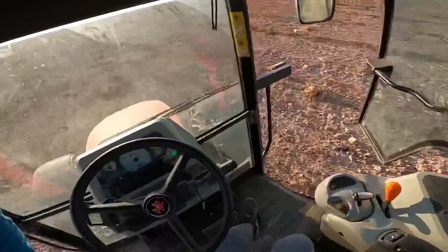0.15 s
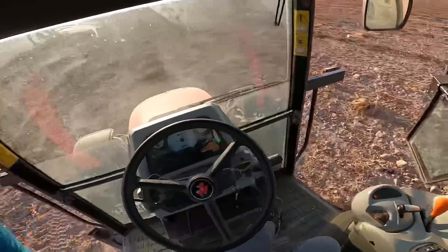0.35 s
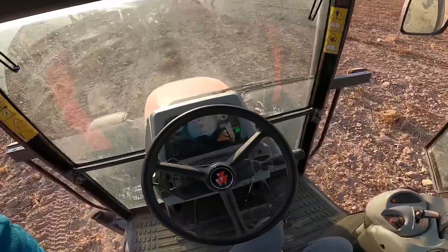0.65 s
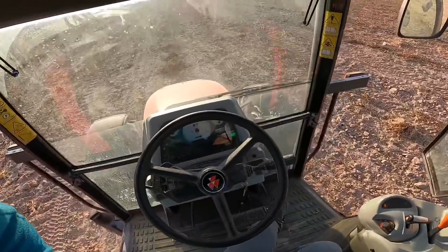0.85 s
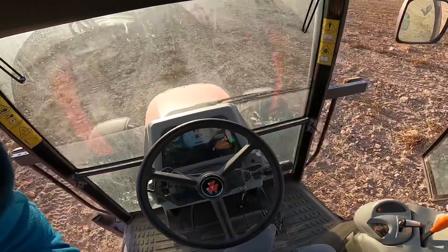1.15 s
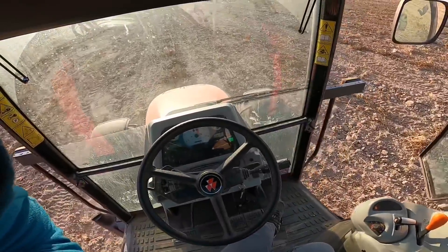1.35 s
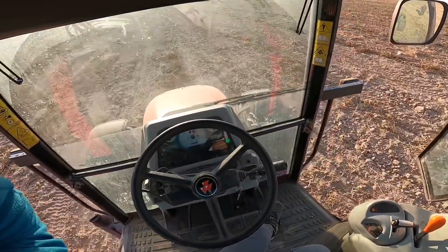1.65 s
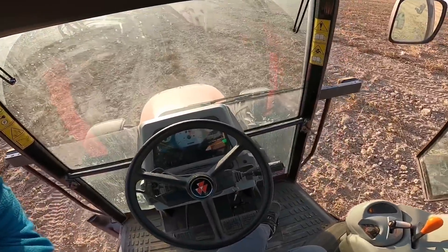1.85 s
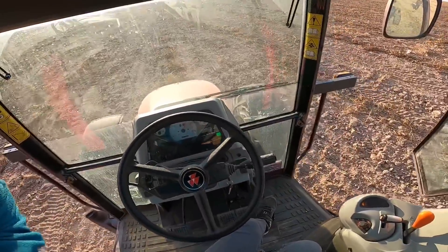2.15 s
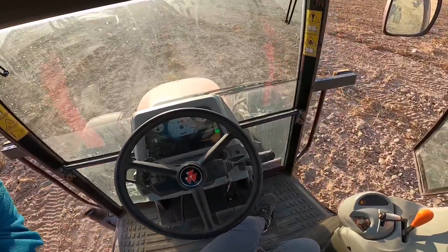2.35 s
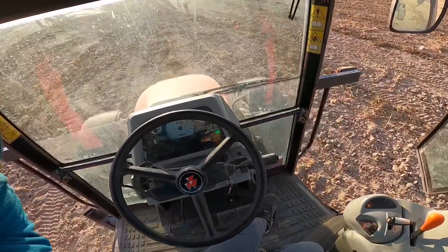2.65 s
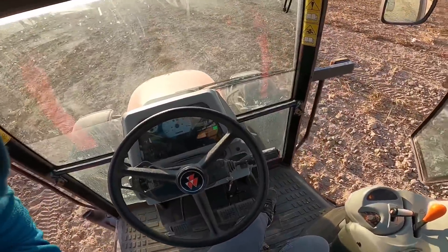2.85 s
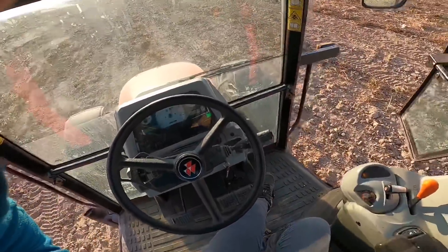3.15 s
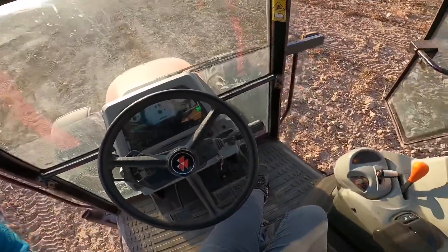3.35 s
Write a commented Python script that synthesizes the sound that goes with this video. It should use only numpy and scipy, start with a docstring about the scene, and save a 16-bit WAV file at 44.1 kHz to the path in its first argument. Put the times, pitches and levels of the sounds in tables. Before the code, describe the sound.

Steady loaded tractor diesel heard from the driver's seat, booming drone, fast knocking and raspy hiss

```python
"""A four-cylinder tractor diesel pulls steadily across a field, heard from the driver's seat.
At first the microphone faces the side window, which colours the sound; at 0.19 s it quickly swings forward.
Throughout, the firing rate booms as a hum, and knocks and rattles repeat with every two turns of the crank.
Over them lie fluttering whines, noise bursts of combustion rasp, and the filtered noise of cab rumble and fan hiss.
The clatter and its metallic band swell and fade, and the rasp ends a little stronger than it began."""
import sys
import numpy as np
from scipy import signal
from scipy.fft import rfft, irfft
from scipy.io import wavfile
from scipy.ndimage import uniform_filter1d

SR = 44100
rng = np.random.default_rng(int(sys.argv[2]) if len(sys.argv) > 2 else 0)


def log_audio(samples):
    """Write samples as a 16-bit WAV file to the path given in sys.argv[1]."""
    # one column per channel
    frames = np.atleast_2d(samples).T
    # limit to full scale, then quantise
    limited = np.clip(frames, -1, 1)
    pcm = np.round(limited * 32767).astype(np.int16)
    wavfile.write(sys.argv[1], SR, pcm)


N = 154350  # samples, 3.5 s

# A "cycle" is two turns of the crank, in which every cylinder fires once.
# Source levels are those before the microphone colours the sound.

# Engine speed: t/s, speed/rpm
ENGINE_SPEED = [(0.0, 1703.5), (0.125, 1693.0), (0.25, 1690.2), (0.375, 1690.0), (0.5, 1690.7),
                (0.625, 1689.7), (0.75, 1690.2), (0.875, 1693.4), (1.0, 1691.6), (1.125, 1691.1),
                (1.25, 1691.7), (1.375, 1689.4), (1.5, 1689.4), (1.625, 1690.1), (1.75, 1687.9),
                (1.875, 1687.3), (2.0, 1685.3), (2.125, 1685.6), (2.25, 1685.5), (2.375, 1687.0),
                (2.5, 1690.4), (2.625, 1690.9), (2.75, 1690.5), (2.875, 1687.7), (3.0, 1688.5),
                (3.125, 1687.1), (3.25, 1685.8), (3.375, 1688.8), (3.5, 1690.3)]

# Background noises, power in each hertz of pitch: f/Hz, level/dB per Hz
RUMBLE_SPECTRUM = [(10, -66), (20, -58), (35, -58), (60, -50), (100, -52), (190, -53), (245, -59.5),
                   (290, -53), (380, -64.5), (520, -63), (680, -63.5), (810, -68), (1500, -99),
                   (6000, -140)]
HISS_SPECTRUM = [(2000, -80), (4000, -79), (5200, -77), (5800, -72), (6400, -81), (7400, -80),
                 (8000, -87.5), (8600, -96.5), (10500, -97), (13000, -106), (15500, -122)]
# Combustion noise, before its pulses and level changes: f/Hz, level/dB per Hz
RASP_SPECTRUM = [(100, -100), (500, -74.5), (810, -73.5), (950, -65.5), (1200, -63), (1600, -63.5),
                 (2000, -67), (2250, -64), (2550, -69.5), (2900, -72), (4000, -71.5), (5000, -82),
                 (7400, -81.5), (8600, -106), (12000, -140)]
# Stereo width of these noises: f/Hz, side over mid/dB
NOISE_WIDTH = [(40, 3.5), (150, -12.5), (300, -19), (600, -4.5), (1000, -9), (1550, -10), (2200, -1),
               (3300, -1.5), (4500, 0), (8000, 1.5)]

# Level of the rasp over time: t/s, level/dB
RASP_LEVEL = [(0, -3), (.6, -1.5), (1.2, -2.7), (1.8, -1), (2.4, -0.9), (3, -1.3), (3.5, 0)]
# How loud each cylinder's rasp is against the others: level/dB, one per cylinder
CYLINDER_LEVEL = [0.58, 0.45, 0.18, -0.44]

# Knocks of pistons, injectors and valves: place in the cycle/0-1, ring f/Hz, peak level/dB
# (before KNOCKS_DB is added), length/s
KNOCKS = [(.03, 280, -24, .007), (.03, 1950, -26.5, .0024), (.07, 1550, -26, .002), (.07, 1030, -28, .0017),
          (.15, 600, -29, .004), (.16, 115, -21, .007), (.17, 1080, -27, .0017), (.19, 1950, -28, .003),
          (.25, 1100, -29, .0015), (.255, 240, -27, .006), (.3, 1350, -29, .0017),
          (.32, 1500, -24.5, .0023), (.35, 620, -28, .003), (.395, 2050, -24.5, .0022),
          (.41, 270, -20, .0055), (.48, 620, -26, .0022), (.52, 1930, -28, .003), (.5, 1550, -30, .0013),
          (.56, 160, -16, .005), (.66, 220, -28, .004), (.66, 640, -28, .003), (.665, 1950, -29, .002),
          (.73, 1550, -28, .0016), (.75, 1130, -23.5, .0032), (.77, 540, -30, .003), (.8, 125, -23, .006),
          (.82, 1680, -27, .002), (.885, 1050, -25, .002), (.89, 1920, -26, .0018), (.94, 290, -26, .005),
          (.95, 1070, -25, .0022)]
# Small rattles between the knocks, level of each engine line: f/Hz, level/dB
RATTLE_LEVEL = [(14, -58), (210, -58), (330, -55.5), (400, -67), (480, -48), (680, -55), (810, -64),
                (950, -61), (1550, -56.5), (2000, -61), (2300, -61), (2550, -60.5), (2800, -57),
                (3500, -59), (5000, -71.5)]
# Strong engine lines, cab drone below and gear and timing whine above:
# multiple of the cycle rate, level/dB (before LINES_DB is added)
STRONG_LINES = [(2, -38), (3, -41), (5, -34), (6, -38), (7, -48), (8, -34), (9, -34), (10, -34), (11, -47),
                (12, -36), (13, -39), (14, -47), (15, -43), (16, -42), (17, -46), (18, -50), (19, -34),
                (20, -39), (21, -36), (22, -52), (23, -49), (24, -53), (31, -47), (34, -49), (35, -46),
                (36, -48), (40, -46), (48, -38), (64, -46), (67, -48), (68, -42), (74, -43), (75, -46),
                (77, -46), (79, -47), (80, -44), (82, -44), (84, -40), (100, -47), (108, -46), (109, -43),
                (111, -48), (112, -46), (115, -47), (116, -43), (120, -46), (130, -41), (136, -42),
                (138, -41), (144, -45.5), (150, -45), (168, -40.5)]
# Part of each line that shifts slowly as the microphone moves in the cab: f/Hz, level/dB
DRIFT_LEVEL = [(60, -74), (280, -51), (400, -59), (520, -57), (675, -56), (810, -65.5), (950, -56),
               (1500, -50.5), (2000, -56.5), (2280, -64.5), (2365, -52), (2450, -60.5), (3000, -58.5),
               (5000, -71.5)]
# Stereo width of the engine lines: f/Hz, side over mid/dB
LINE_WIDTH = [(60, -7), (150, -15.5), (300, -18), (600, -19), (1100, -20.5), (1550, -22), (2000, -21),
              (3000, -1)]
# Clatter over time: t/s, level/dB, extra level of its metallic band/dB
CLATTER_LEVEL = [(0, -1, 0), (.5, 0.5, -3.5), (1, 0.5, 0), (1.5, -0.1, 3.5), (2, -0.5, 2), (2.5, 0.5, -1),
                 (3, 0.6, -0.5), (3.5, 0, 2)]

# The cab's left-right balance: f/Hz, left over right/dB
CAB_BALANCE = [(100, -0.1), (250, -.5), (900, 0.5), (1550, 2.8), (2700, 3), (4500, 2.5), (7100, 3),
               (8000, -1.5), (10500, -4.5), (13000, -2)]
# Phase between the microphone's two ports: f/Hz, left ahead of right/radians
PORT_PHASE = [(100, -0.027), (950, -0.23), (1550, -0.8), (2300, -1.75), (3000, -0.73), (4000, -1.37)]
# Colour of the cab while the microphone faces the side window: f/Hz, level/dB
SIDEWAYS_COLOUR = [(150, 0.5), (350, 2), (520, 0), (590, -9), (680, -1.5), (780, 1.5), (1100, -0.5),
                   (1700, 1.5), (1950, -2), (2200, 6), (2365, 0.5), (2550, 7.5), (2900, 0), (5000, 2.5),
                   (9000, -0.5)]

CYLINDERS = 4
# Tones at average engine speed: pitch, level, unsteadiness of pitch
PUMP_HZ, PUMP_DB, PUMP_UNSTEADY_HZ = 584.2, -37.5, 1.0
PANEL_HZ, PANEL_DB, PANEL_UNSTEADY_HZ = 223.8, -39, 3.5
DRIVE_HZ, DRIVE_DB, DRIVE_UNSTEADY_HZ = 943, -43, 1.2
RASP_PULSE_DB, RASP_FLICKER_DB = 6, 2.3
RASP_DECAY = 0.12  # share of the time between firings
RASP_LAG, BOOM_LAG = .155, .023  # share of a cycle: first cylinder's flare, peak of the boom
KNOCKS_DB, LINES_DB = -1.97, -0.15
CRANK_JITTER_S = .000008
DRIFT_HZ = 1.17  # pace of the wandering blend
CLATTER_WAVER_DB = 0.39
BRIGHT_HZ, BRIGHT_WIDTH_HZ = 2154, 420  # the clatter's metallic band
BOOM_DB, BOOM_WAVER_DB, BOOM_LEFT_DB = -15, -0.9, 0.5
TURN_S, TURN_LENGTH_S = 0.19, 0.043  # start and length of the microphone's swing forward
SIDEWAYS_PATH_S = 0.00023  # spread of the echo paths before the swing
TOP_HZ = 15700


def undb(db):
    """Turn decibels into gain."""
    return 10 ** (np.asarray(db) / 20)


def curve(points, hz):
    """Read (Hz, value) points on a log-frequency axis."""
    p = np.array(points, float)
    return np.interp(np.log(np.maximum(hz, 1)), np.log(p[:, 0]), p[:, 1])


def pan(left_db):
    """Left and right gains for a level difference, keeping the average power."""
    gains = undb(np.array([[1], [-1]]) * left_db / 2)
    return gains / np.sqrt(np.mean(gains ** 2, axis=0))


def walk(rate):
    """Smooth random wandering of spread 1, changing about rate times a second."""
    f = np.fft.rfftfreq(N, 1 / SR)
    smoothing = np.exp(-(f / rate) ** 2) * (f > 0)
    wander = irfft(rfft(rng.standard_normal(N)) * smoothing, N)
    return wander / wander.std()


def facing_forward(t):
    """How far the microphone has swung: 0 is sideways, 1 is forward."""
    return np.clip((t - TURN_S) / TURN_LENGTH_S, 0, 1)


def noise(spectrum):
    """Stereo noise of a given spectrum, from a shared (mid) and an opposed (side) random part."""
    f = np.fft.rfftfreq(N, 1 / SR)
    mid, side = rfft(rng.standard_normal((2, N)))
    width = undb(curve(NOISE_WIDTH, f))
    both = (mid + np.array([[1], [-1]]) * width * side) / np.hypot(1, width)
    return irfft(both * undb(curve(spectrum, f)) * np.sqrt(SR / 2), N)


def fan_hiss():
    """The fan's hiss is steady noise in the treble."""
    return noise(HISS_SPECTRUM)


def cab_rumble():
    """The cab's rumble is steady noise, strongest in the bass."""
    return noise(RUMBLE_SPECTRUM)


def whine(speed, hz, db, unsteady_hz):
    """A fluttering tone that follows the engine's speed (1 is average)."""
    pitch = hz * speed + unsteady_hz * walk(19.2)
    phase = 2 * np.pi * np.cumsum(pitch) / SR
    flutter_db = 1.5 * walk(19)
    return np.sqrt(2) * np.sin(phase) * undb(db + flutter_db)


def accessories(speed):
    """The hydraulic pump, a buzzing cab panel and a faint drive whine each give one tone."""
    pump = whine(speed, PUMP_HZ, PUMP_DB, PUMP_UNSTEADY_HZ)
    panel = whine(speed, PANEL_HZ, PANEL_DB, PANEL_UNSTEADY_HZ)
    drive = whine(speed, DRIVE_HZ, DRIVE_DB, DRIVE_UNSTEADY_HZ)
    return pump + panel + drive


def rasp(cycle, t):
    """Combustion noise flares at each firing and dies away, a little differently for each cylinder."""
    firing = CYLINDERS * (cycle + 1 - RASP_LAG)  # the whole part counts the firings
    flare = np.exp(-(firing % 1) / RASP_DECAY)
    cylinder_db = np.array(CYLINDER_LEVEL)[firing.astype(int) % CYLINDERS]
    pulse_db = RASP_PULSE_DB * (flare - flare.mean()) + cylinder_db
    smooth_db = uniform_filter1d(pulse_db, size=60)  # softens the jumps
    flickering = noise(RASP_SPECTRUM) * undb(smooth_db + RASP_FLICKER_DB * walk(21))
    return flickering * undb(np.interp(t, *np.array(RASP_LEVEL).T))


def knocks(k, cycle_hz):
    """Engine lines of the knocks: each knock swells and dies away at its own pitch."""
    place, hz, db, length = np.array(KNOCKS).T[:, :, None]
    ring = np.exp(-(np.pi * length * (k * cycle_hz - hz)) ** 2) * length * cycle_hz * np.sqrt(np.pi / 2)
    timing = np.exp(-2j * np.pi * k * place)
    return np.sum(undb(db + KNOCKS_DB) * ring * timing, axis=0)


def rattle(spectrum, hz):
    """Small rattles: engine lines of given levels with random timing."""
    return undb(curve(spectrum, hz)) * np.exp(2j * np.pi * rng.random(len(hz)))


def repeat(lines, hz, angle, size=16384):
    """Play engine lines round and round with the crank, shifted apart in phase for stereo width."""
    lead = np.sign(rng.random(len(hz)) - .5) * np.array([[1], [-1]])
    apart = np.arctan(undb(curve(LINE_WIDTH, hz))) * lead
    one_cycle = irfft(np.pad(lines * np.exp(1j * apart), ((0, 0), (1, 0))), size) * size / np.sqrt(2)
    place = angle % 1 * size
    return np.array([np.interp(place, np.arange(size + 1), np.append(side, side[0])) for side in one_cycle])


def swell(sound, t):
    """The clatter's level changes over time, with extra changes in its metallic band."""
    at, all_db, bright_db = np.array(CLATTER_LEVEL).T
    f = np.fft.rfftfreq(N, 1 / SR)
    bright = irfft(rfft(sound) * np.exp(-((f - BRIGHT_HZ) / BRIGHT_WIDTH_HZ) ** 2), N)
    extra = bright * (undb(np.interp(t, at, bright_db)) - 1)
    return (sound + extra) * undb(np.interp(t, at, all_db))


def clatter(cycle, t, count=360, blends=4):
    """Knocks, rattles and gear mesh repeat each cycle; their blend shifts as the microphone moves."""
    k = np.arange(1, count + 1)
    hz = k * cycle[-1] * SR / N  # multiples of the average cycle rate
    lines = knocks(k, hz[0]) + rattle(RATTLE_LEVEL, hz)
    lines = lines * (k != CYLINDERS)  # the boom supplies the firing rate
    for order, line_db in STRONG_LINES:
        i = int(order) - 1
        lines[i] *= undb(line_db + LINES_DB) / abs(lines[i])  # new level, same timing
    angle = cycle + CRANK_JITTER_S * hz[0] * walk(21)

    blend = np.array([walk(DRIFT_HZ) for _ in range(blends)])
    shares = blend / np.linalg.norm(blend, axis=0)  # keeps the total power even
    drift = sum(repeat(rattle(DRIFT_LEVEL, hz), hz, angle) * share for share in shares)

    # Before the swing, scattered echo paths shift the lines in time.
    sideways = lines * np.exp(2j * np.pi * hz * SIDEWAYS_PATH_S * rng.standard_normal(count))
    turned = facing_forward(t)
    steady = repeat(sideways, hz, angle) * (1 - turned) + repeat(lines, hz, angle) * turned
    return swell((steady + drift) * undb(CLATTER_WAVER_DB * walk(30)), t)


def boom(cycle):
    """The firing rate resonates in the cab as a deep hum, one wave per firing."""
    hum = np.sqrt(2) * np.cos(2 * np.pi * CYLINDERS * (cycle - BOOM_LAG))
    return hum * undb(BOOM_DB + BOOM_WAVER_DB * walk(6)) * pan(BOOM_LEFT_DB)


def microphone(sound, t, size=4096):
    """Two ports a little apart hear phase and level differences, first sideways, then forward."""
    f = np.fft.rfftfreq(N + 2 * size, 1 / SR)
    phase = np.exp(.5j * np.array([[1], [-1]]) * curve(PORT_PHASE, f))
    ports = pan(curve(CAB_BALANCE, f)) * phase
    # Mirrored ends keep the filter from wrapping the end into the start.
    padded = np.pad(sound, ((0, 0), (size, size)), mode="reflect", reflect_type="odd")
    heard = rfft(padded) * ports
    before = irfft(heard * undb(curve(SIDEWAYS_COLOUR, f)), N + 2 * size)[:, size:-size]
    after = irfft(heard, N + 2 * size)[:, size:-size]
    turned = facing_forward(t)
    return before * (1 - turned) + after * turned


def scene():
    """One crankshaft drives the boom, clatter, rasp and whines; a cycle is two turns."""
    t = np.arange(N) / SR
    rpm = np.interp(t, *np.array(ENGINE_SPEED).T)
    cycle = np.cumsum(rpm) / 120 / SR  # cycles so far
    engine = boom(cycle) + clatter(cycle, t) + rasp(cycle, t)
    background = accessories(rpm / rpm.mean()) + cab_rumble() + fan_hiss()
    return microphone(engine + background, t)


def record(dry):
    """The sound fades in over a millisecond, and a steep low-pass filter cuts the top."""
    faded_in = dry * np.minimum(np.arange(N) / SR / .001, 1)
    low_pass = signal.ellip(8, .1, 80, TOP_HZ, fs=SR, output="sos")
    return signal.sosfilt(low_pass, faded_in)


dry = scene()
out = record(dry)
log_audio(out)
```